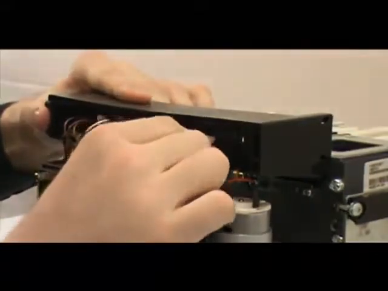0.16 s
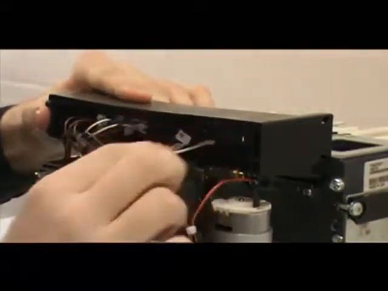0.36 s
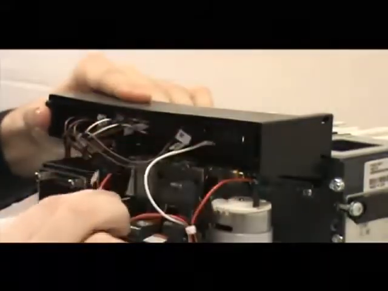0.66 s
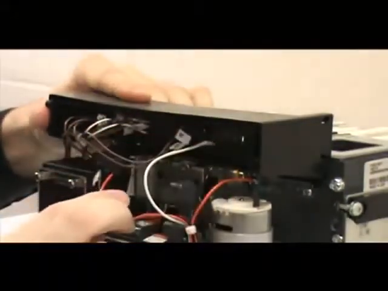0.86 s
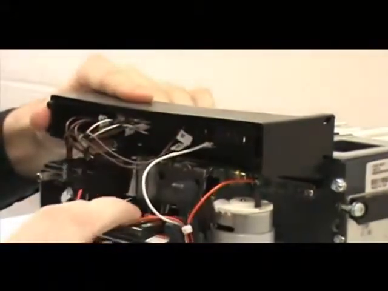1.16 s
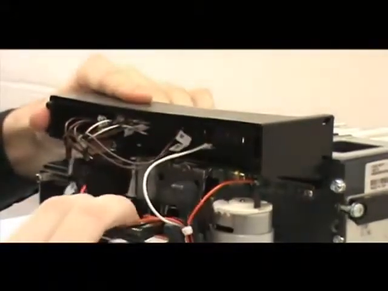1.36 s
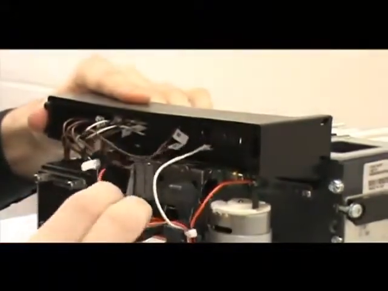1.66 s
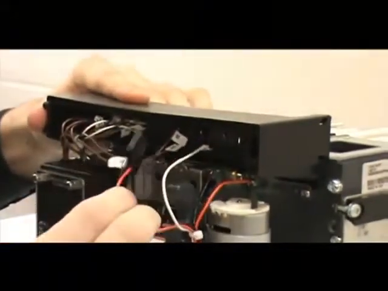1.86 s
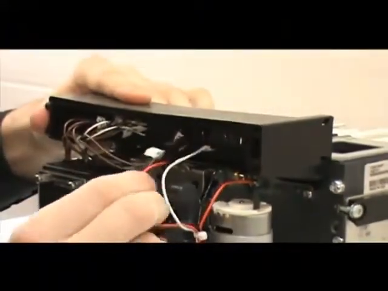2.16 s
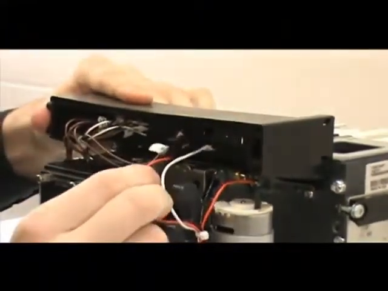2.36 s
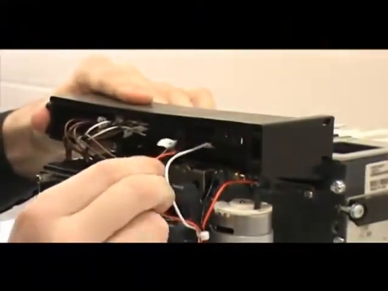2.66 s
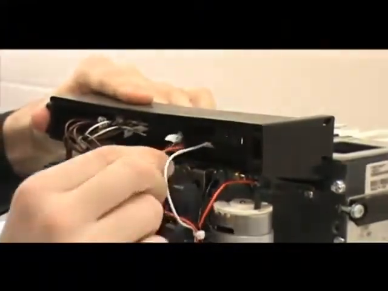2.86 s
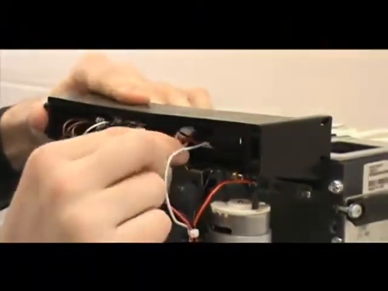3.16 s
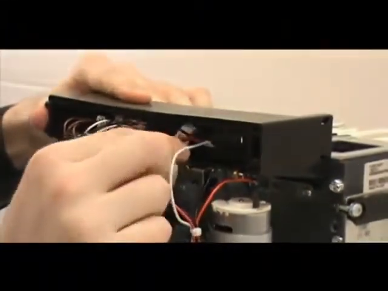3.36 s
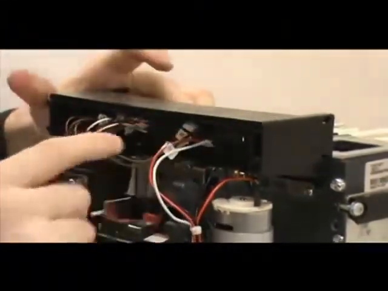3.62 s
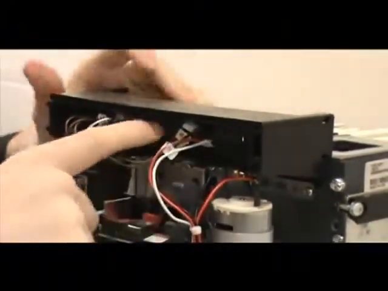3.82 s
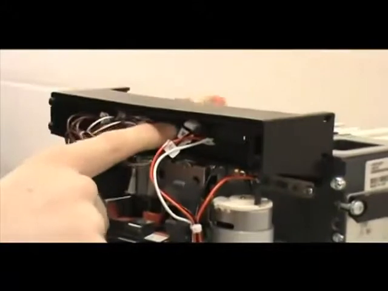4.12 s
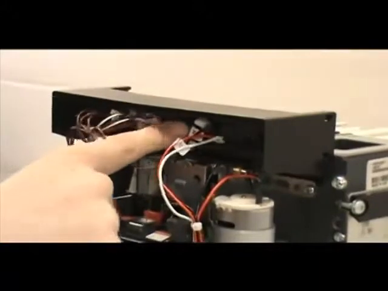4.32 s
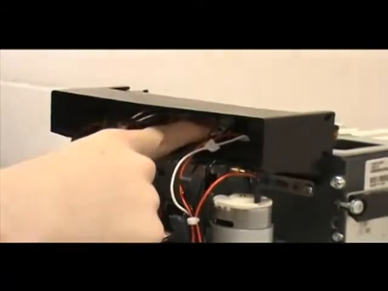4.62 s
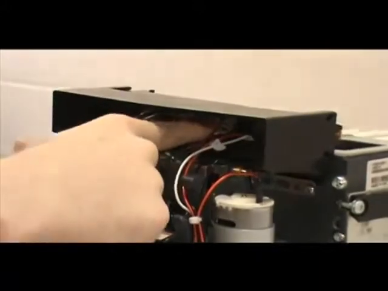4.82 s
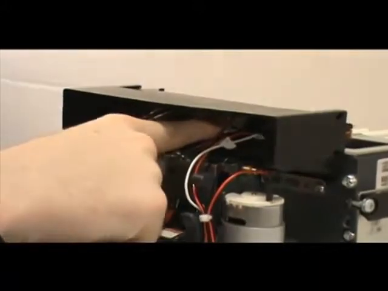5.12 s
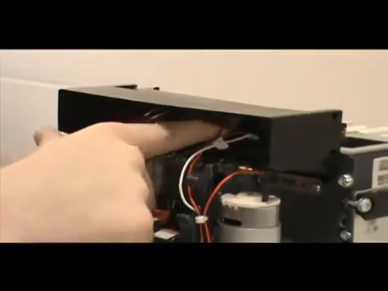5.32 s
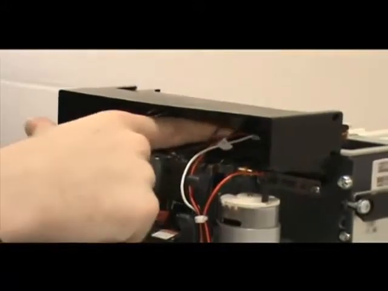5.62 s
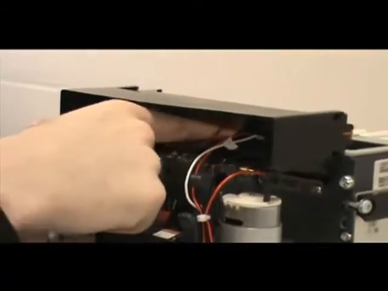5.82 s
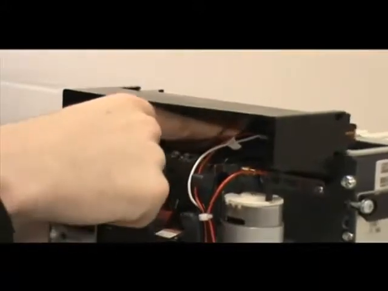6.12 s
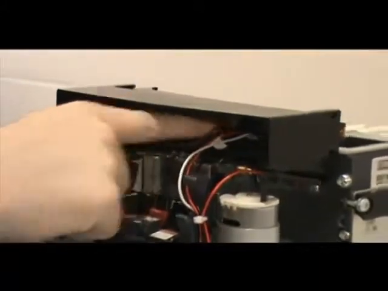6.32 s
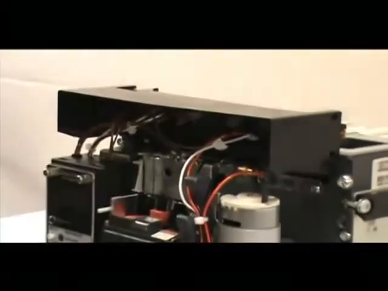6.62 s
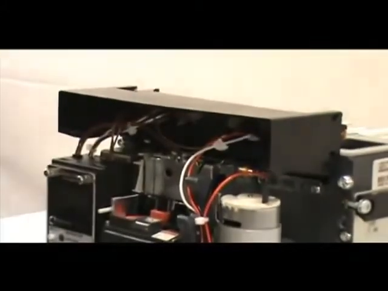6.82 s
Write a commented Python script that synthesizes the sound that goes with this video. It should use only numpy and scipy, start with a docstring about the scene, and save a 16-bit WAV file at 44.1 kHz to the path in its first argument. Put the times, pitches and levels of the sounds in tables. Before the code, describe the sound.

Fingers push plastic wire connectors into a thin metal bracket, very close. A hard double click opens, then near quiet with tiny ticks. Small rattling snaps come near two seconds, a crisp one past three, then gritty scraping leads to the loudest snap just before five. Another strong click follows past six, then a light clatter and a soft sleeve rub. Small room, faint steady low hum and hiss, close stereo microphones.

```python
"""In a small room, fingers push plastic wire connectors into a sheet-metal bracket close to the microphones.
Latches snap in bursts of uneven contacts that ring the bracket's modes; a loose part pings on single notes
and the hollow case thuds as filtered noise. Wires, skin and a sleeve rub over it as grains of friction.
Wavering tones of a fan and the mains hum under the shaped noise of room air and microphone hiss."""
import sys
import numpy as np
from scipy import signal
from scipy.fft import rfft, irfft, next_fast_len
from scipy.io import wavfile
from scipy.ndimage import uniform_filter1d

SR = 44100
rng = np.random.default_rng(int(sys.argv[2]) if len(sys.argv) > 2 else 0)


def field_ratio(decibels):
    """Amplitude ratio for a level in dB (20 dB per decade); scalars and array-likes work."""
    return 10 ** (np.asarray(decibels, dtype=float) / 20)


def transcribe(u):
    """Save the signal u as a 16-bit wav file named by the first command-line argument.

    u: samples, shape (n,) or (channels, n), limited to [-1, 1]; the rate is SR.
    q: integer samples, one column per channel.
    """
    v = np.clip(np.atleast_2d(u).T, -1, 1)
    q = np.round(v * 32767).astype(np.int16)
    wavfile.write(sys.argv[1], SR, q)


N = 307725  # length of the scene [samples]

# latch snaps and knocks, each timed at its first hard hit:
# (time [s], direct peak level [dB], hardness [dB per octave], ring of the latch tongue [dB], slip length [ms])
SNAPS = [(0.0084, 0.5, 6.5, -10, 2.7), (0.0111, -5.5, 2.5, -9, 1.8), (0.651, -41.5, -3, -4, 7),
         (1.246, -39.5, -0.5, 0, 5.5), (1.804, -24, 5.5, -11, 6.6), (1.811, -37, 0, -1, 5.6),
         (1.818, -37, -3, -6, 3.5), (1.850, -18.5, 12, -7, 4.3), (1.858, -26, 11, -4, 4.6),
         (1.866, -36, 0, -7, 3.7), (2.004, -25, 11, -5, 13), (2.014, -28, -6, -9, 3.3),
         (2.022, -27.5, 2, -14, 3.3), (2.030, -33, -3, -8, 2.5), (2.281, -37.5, -1.5, 0, 11),
         (2.808, -36.5, -2, -9, 5.9), (3.117, -29.5, 4.5, -10, 4.5), (3.252, -40, 6, -3, 4.3),
         (3.28, -26.5, 4, -15, 3.7), (3.2843, -11, 2.5, -4, 2.2), (3.285, -12.5, -1, -27, 2.3),
         (3.617, -33, 0, -13, 6.2), (3.627, -29.5, 13, -14, 2.4), (3.766, -34.5, 17, -2, 3.2),
         (3.801, -45.5, -12, -2, 6.6), (3.982, -40, 11, 4, 3.6), (4.336, -37.5, -2.5, 4, 7.2),
         (4.443, -39, -15, -1, 11), (4.476, -40, -2, -3, 4.5), (4.6285, -34, 0, -1, 5),
         (4.649, -30, 0, 5, 5), (4.662, -20, 5, -12, 11), (4.694, -26, -2, -3, 5.5),
         (4.711, -19.5, -5, -4, 5.4), (4.729, -35, 2, 3, 4.1), (4.751, -34, -8, -8, 7.6),
         (4.889, -23, -1, 4, 3.3), (4.893, 8, 3, 5, 1.7), (4.902, -7.5, 9, -8, 2.1), (4.914, -9, 1, -3, 5),
         (4.928, -29, 0, -2, 5), (4.949, -25, 6, -9, 7.8), (5.033, -33.5, -7.5, -4, 7.4),
         (5.38, -35.5, -0.5, 6, 5.2), (5.417, -28.5, -2, 1, 8.6), (5.946, -40, -10, -9, 2.9),
         (6.068, -39.5, -5, -4, 3.7), (6.075, -40, -5, -4, 3), (6.1125, -11, 7, -2, 0.91),
         (6.1147, -2.5, 0.5, 0, 2.8), (6.362, -28.5, -5.5, 14, 4.3), (6.379, -35, -2, 4, 4.5),
         (6.401, -38, 0, 2, 8), (6.482, -40, -8, -3, 5.2), (6.514, -16, 5.5, 0, 5.3),
         (6.5187, -14.5, 2, 0, 1.2), (6.521, -13.5, -0.5, 2, 1.34), (6.533, -23, -3.5, 1, 10)]
# colour of a plain snap, band by band: (band centre [Hz], level [dB])
SNAP_COLOUR = [(1500, -5), (3400, -1.5), (5600, 1), (8800, -0.5)]
# echo after a snap, one entry for each of those bands: (level [dB])
SNAP_ECHO_DB = [-8.5, -9.5, -10.5, -7.5]


def snap(s, peak_db, hard_db, tongue_db, slip_ms):
    """A faint noise rises for a few milliseconds, then a quick run of uneven contacts rings the bracket."""
    lead_in_s, centres_hz = .005, [720, 1500, 3400, 5600, 8800]
    colour_db = [db + hard_db * np.log2(hz / centres_hz[2]) for hz, db in SNAP_COLOUR]
    colour_db[2] += tongue_db
    colour_db[1] -= 0.28 * tongue_db  # the tongue's ring takes a share from the band below it

    t = np.arange(-lead_in_s, .04, 1 / SR)
    lead_in = field_ratio(-26 + 4400 * t)
    slip = np.clip(t / 0.00045, .1, 1) * np.exp(-(1000 * abs(t) / max(slip_ms, .3)) ** 2.2)
    first_crack = 0.72 * (t >= 0) * np.exp(-abs(t - .0008) / 0.00024)  # the hardest contact
    force = np.where(t < 0, lead_in, slip) + first_crack
    chance = rng.standard_normal((2, len(t)))
    hits = force * chance[0] * field_ratio(2.9 * chance[1])
    contacts = signal.fftconvolve(hits, bracket(ring_db=-6.0))

    # each band gets its strongest short-term level from the colour, then the sum gets its peak
    parts = [part * field_ratio(db) / np.sqrt(uniform_filter1d(part ** 2, size=90).max())
             for db, part in zip(colour_db, bands(contacts, centres_hz))]
    parts = np.array(parts) * field_ratio(peak_db) / abs(sum(parts)).max()

    # the case takes the run as one blow and evens out its colour
    blow = np.pad(bracket(ring_db=-4.5, hold=1.34), (round(lead_in_s * SR), len(t)))
    strength = np.linalg.norm(parts, axis=1)
    strength = strength ** 0.73 * strength.mean() ** (1 - .75)
    echoed = sum(size * whole / np.linalg.norm(whole)
                 for size, whole in zip(strength * field_ratio(SNAP_ECHO_DB), bands(blow, centres_hz)))
    return s - lead_in_s, heard(sum(parts), echoed, echo_db=0)


# modes of bracket and latch, before the shift of each contact:
# (frequency [Hz], relative level [dB], time to fall by 60 dB [s])
BRACKET_MODES = [(886, -3.5, 0.16), (1300, -10, 0.062), (1976, 9, 0.028), (2410, 10.5, 0.0032),
                 (3370, 1.5, 0.028), (4180, 0.5, 0.032), (4900, -5, 0.019), (5020, 9, 0.0093),
                 (5980, 9, 0.0089), (8220, 5, 0.025), (8980, 16, 0.0047), (10200, 11.5, 0.015)]


def bracket(ring_db, hold=1):
    """One sharp contact, then decaying modes; each spot touched shifts them and favours others; hold lengthens."""
    t = np.arange(3000) / SR
    ring = np.zeros(len(t))
    for hz, db, t60 in BRACKET_MODES:
        shift, favour, phase = rng.standard_normal(3)
        fading = field_ratio(db + 2.0 * favour - 60 * t / (hold * t60))
        ring += fading * np.sin(2 * np.pi * (hz * (1 + 0.029 * shift) * t + phase))
    ring *= field_ratio(ring_db) / np.linalg.norm(ring)
    ring[0] += 1
    return ring


# a loose part rings on one note:
# (time [s], level [dB], settled pitch [Hz], time to fall by 60 dB [s])
PINGS = [(2.231, -39.5, 2150, 0.053), (3.118, -35, 2070, .035), (3.776, -38.5, 872, 0.16),
         (4.336, -40, 5000, .03), (6.419, -39, 4230, 0.03), (6.426, -41, 4300, 0.03),
         (6.432, -42, 4300, 0.03), (6.521, -25, 1970, 0.03)]


def ping(db, hz, t60):
    """One soft-struck mode, roughened by the touch that damps it, sliding up as the part comes free."""
    t = np.arange(0, t60, 1 / SR)
    flutter = evened(uniform_filter1d(rng.standard_normal(len(t)), round(6.0 * SR / hz)))
    touch = 1 + .3 * flutter
    pitch_hz = hz * (1 - .16 * np.exp(-t * hz / 5))
    soft_start = np.minimum(t * hz / 2.0, 1)  # about two cycles
    note = field_ratio(db - 60 * t / t60) * soft_start * touch * np.sin(2 * np.pi * np.cumsum(pitch_hz) / SR)
    return heard(note, note, echo_db=-15.0)


# the hollow case answers a bump with a dull thud, a snap or scuff with a higher clack:
# (time [s], level [dB], centre frequency [Hz], time to fade by 20 dB [s])
THUDS = [(0.009, -31.5, 3430, .04), (0.015, -39, 1000, 0.033), (0.123, -47, 230, 0.055),
         (1.852, -42, 1040, .02), (1.864, -48.5, 304, 0.095), (1.885, -64, 540, 0.02),
         (1.925, -55, 450, 0.028), (3.043, -55, 2880, 0.033), (3.085, -54, 2060, 0.038),
         (3.289, -38, 2900, 0.045), (3.29, -52, 490, 0.051), (4.1, -52, 6400, 0.033),
         (4.143, -50, 6400, 0.028), (4.148, -55, 4900, .03), (4.336, -49, 550, 0.037),
         (4.648, -43.5, 920, 0.15), (4.66, -53, 238, 0.15), (4.89, -40, 1300, 0.025),
         (5.447, -52.5, 1860, 0.092), (5.943, -57, 563, .03), (5.948, -53, 1540, 0.049),
         (6.073, -50, 970, 0.031), (6.254, -61, 2640, 0.099)]


def thud(db, hz, length_s):
    """A soft push of noise through the resonance of the hollow case: quick swell, slower fade."""
    t = np.arange(0, 2 * length_s, 1 / SR)
    width_hz = 0.23 * hz + 90  # a share of the pitch, plus what the hand on the case adds
    r = np.exp(-np.pi * width_hz / SR)
    body = rng.standard_normal(len(t))
    for _ in range(2):
        body = signal.lfilter([1, 0, -1], [1, -2 * r * np.cos(2 * np.pi * hz / SR), r * r], body)
    swell = np.minimum(t / (0.055 * length_s), 1)
    sound = field_ratio(db - 20 * (t / length_s) ** 2) * swell * evened(body)
    return heard(sound, sound, echo_db=-7.0)


# fingers and wires slide over the bracket, timed at the most pressure:
# (time [s], rise [s], fall [s], level of the middle band [dB], hardness [dB of treble])
RUBS = [(1.809, 0.035, 0.024, -51, -3.5), (1.856, 0.011, 0.027, -48, -5.5),
        (2.021, 0.065, 0.039, -48.5, -2.5), (2.86, 0.19, 0.2, -68, -1.5), (3.07, 0.31, 0.089, -66, -4.5),
        (3.128, 0.0068, 0.058, -60, -7.5), (3.273, 0.039, 0.013, -53.5, -4), (3.618, 0.11, 0.069, -57, -2),
        (3.681, 0.061, 0.017, -53.5, -0.5), (3.98, 0.034, 0.052, -59, -2), (4.56, 0.29, 0.39, -52, -0.5),
        (4.635, 0.012, .06, -47, -4.5), (4.685, 0.1, 0.081, -40, 0.5), (4.872, 0.042, 0.35, -63.5, -5.5),
        (4.96, 0.035, 0.083, -47, 1.5), (5.32, 0.064, 0.072, -58, -3), (5.412, 0.058, 0.03, -55, 8),
        (5.491, 0.067, 0.055, -63, -4), (5.64, 0.14, 0.13, -64.5, -2.5), (5.89, 0.22, 0.071, -58.5, -3),
        (5.96, 0.064, 0.077, -66, -6), (6.084, 0.03, 0.026, -61, -9), (6.26, 0.095, 0.065, -65, -3.5),
        (6.31, 0.033, 0.044, -56.5, -6), (6.368, 0.024, 0.034, -48, -2.5), (6.419, 0.048, 0.067, -49, 0.5),
        (6.495, 0.04, 0.16, -52.5, -1.5)]


def rub(s, rise_s, fall_s, db, hard_db):
    """Pressure swells 20 dB over the rise and drops 20 dB over the fall; a harder contact trades bass for treble."""
    t = np.arange(-.35, .35, 1 / SR)
    away = np.where(t < 0, -t / max(rise_s, .003), t / max(fall_s, .003))
    level_db = db - 20 * away ** 1.53  # the exponent rounds the swell
    # the low spread keeps strokes near the centre
    return s + t[0], friction(level_db, bass_db=-7.5 - 2 * hard_db, treble_db=-3.5 + hard_db, spread_db=-20,
                              ring_db=-6.5, clump_db=3.0, centres_hz=[300, 1050, 3800, 9000])


# the hand and sleeve draw back along the case, off to one side:
# (time [s], level of the middle band [dB])
SLEEVE = [(6.6, -61), (6.698, -59), (6.79, -57.5), (6.83, -51), (6.91, -52.5), (6.94, -54), (6.978, -53)]


def sleeve():
    """One long, dull, wide stroke; cloth hardly rings the metal."""
    s, db = np.transpose(SLEEVE)
    level_db = np.interp(np.arange(s[0], N / SR + 0.019, 1 / SR), s, db)
    return s[0], friction(level_db, bass_db=1.5, treble_db=-3, spread_db=8.5,
                          ring_db=-40, clump_db=1.3, centres_hz=[120, 750, 2600, 9000])


def friction(level_db, bass_db, treble_db, spread_db, ring_db, clump_db, centres_hz):
    """Dense uneven grains of friction excite the bracket; the fingers damp most of the ring."""
    count = len(level_db)
    clumps = evened(uniform_filter1d(rng.standard_normal(count), size=220))
    grit = np.minimum(rng.exponential(1, count), 4)
    grains = rng.standard_normal(count) * field_ratio(clump_db * clumps + 3.5 * grit)
    scraped = signal.fftconvolve(grains, bracket(ring_db))[:count]
    bass, mid, treble = bands(scraped, centres_hz)
    sound = evened(mid) + field_ratio(bass_db) * evened(bass) + field_ratio(treble_db) * evened(treble)
    sound *= field_ratio(level_db) * signal.windows.tukey(count, .1)
    return heard(sound, sound, echo_db=-6.5) * field_ratio([[0], [spread_db]])


# case and table ring on: (frequency [Hz], time to fall by 60 dB [s])
ECHO_DECAY = [(500, 0.43), (1300, 0.14), (3500, 0.25), (9000, 0.15)]


def echo():
    """Dense reflections from case, table and walls, arriving in lumps, as sum and difference of the microphones."""
    noise = rng.standard_normal((2, SR // 4))
    hz, t, z = signal.stft(noise, SR, nperseg=128)
    decay = field_ratio(-60 * t / read(ECHO_DECAY, hz)[:, None])
    tail = signal.istft(z * decay, SR, nperseg=128)[1]
    s = np.arange(tail.shape[1]) / SR
    lumps = evened(uniform_filter1d(rng.standard_normal(len(s)), size=130))
    early = np.clip((s - .003) / 0.00064, 0, 1) * field_ratio(-4)  # case and table alone, more softly
    first_walls = 1 + 0.6 * np.exp(-(s / .02) ** 2)  # the first few answers stand out
    walls = np.clip((s - .007) / 0.0017, 0, 1) * first_walls
    tail = tail * np.maximum(early, walls) * field_ratio(2.0 * lumps)
    return tail / np.linalg.norm(tail[0]) * field_ratio([[0], [-3.0]])


def heard(sound, echoed, echo_db):
    """Sum and difference: the direct sound reaches the left microphone first; the echo follows."""
    lag = 4 / SR
    wet = field_ratio(echo_db) * signal.fftconvolve(echoed[None], echo(), axes=1)
    add(wet[0], lag, sound)
    add(wet[1], 0, sound / 2)
    add(wet[1], 2 * lag, -sound / 2)
    add(wet[1], lag, 0.26 * sound)  # a little louder on the left
    return wet


# tones of the fan and mains: (frequency [Hz], rms level [dB], waver rate [Hz], waver depth [share])
HUM = [(32.8, -60.5, 20, 0.82), (119.6, -56.5, 5.2, 0.91), (139, -51.5, 0.44, 0.034),
       (241.7, -69, 0.48, 0.25), (349, -74, 12, 0.26)]


def hum():
    """Narrow tones of the fan and mains, each wavering in level; the strongest also throbs slowly."""
    hz, t, out = np.fft.rfftfreq(N, 1 / SR), np.arange(N) / SR, np.zeros(N)
    period_s, crest_s, throb_depth = 2.167, 0.58, 0.45
    throb = throb_depth * np.exp(2j * np.pi * (t - crest_s) / period_s)
    for i, (centre_hz, db, waver_hz, depth) in enumerate(HUM):
        slow = 1 / (1 + (hz / waver_hz) ** 4)
        a, b = (evened(irfft(rfft(rng.standard_normal(N)) * slow, N)) for _ in range(2))
        level = 1 + depth * (a + 1j * b) + throb * (i == 2)  # entry 2 is the strongest
        out += field_ratio(db) * evened((level * np.exp(2j * np.pi * centre_hz * t)).real)
    return out


# colour of room air and hiss in the sum of the microphones: (frequency [Hz], relative level [dB per Hz])
AIR_MID = [(12, -71), (20, -10.5), (38, -8), (91, -10.5), (139, -8.5), (155, -10), (168, -12), (231, -13),
           (920, -28.5), (1170, -27.5), (2330, -26), (2590, -30), (9800, -33.5), (10600, -34.5),
           (11500, -37), (15000, -96), (22000, -120)]
# the same in their difference: (frequency [Hz], relative level [dB per Hz])
AIR_SIDE = [(35, -42), (60, -40), (130, -11.5), (188, -56), (364, 0.5), (1490, 1.5), (2120, 1.5), (2410, 6),
            (2880, -4), (4880, -12.5), (9030, -25), (9860, -34), (11500, -52), (15000, -93), (22000, -120)]


def air(spectrum, db, vary_db):
    """Noise of a given colour and rms level, with a level that varies slowly at random across time and frequency."""
    frames, hz = N // 512 + 5, np.fft.rfftfreq(2048, 1 / SR)
    a, b, variation = rng.standard_normal((frames, 1025, 3)).T
    variation = evened(uniform_filter1d(uniform_filter1d(variation, 20, 0), 8, 1))
    z = (a + 1j * b) * field_ratio(read(spectrum, hz)[:, None] + vary_db * variation)
    return field_ratio(db) * evened(signal.istft(z, nperseg=2048, noverlap=1536)[1][:N])


def evened(x):
    """Scales a signal to an rms of one."""
    return x / np.sqrt(np.mean(x ** 2) + 1e-20)


def read(points, hz):
    """Reads a curve of (frequency, value) points along a logarithmic frequency axis."""
    f, value = np.transpose(points)
    return np.interp(np.log(hz + 1), np.log(f + 1), value)


def add(mix, s, sound):
    """Lays a sound into the mix at a time in seconds, cut off at the end."""
    part = mix[..., round(s * SR):][..., :sound.shape[-1]]
    part += sound[..., :part.shape[-1]]


def bands(x, centres_hz):
    """Splits a sound into overlapping bands that add up evenly; nothing is left under the first centre."""
    size = next_fast_len(len(x))
    octave, spectrum = np.log2(np.fft.rfftfreq(size, 1 / SR) + 1), rfft(x, size)
    shares = [np.interp(octave, np.log2(centres_hz), one) for one in np.eye(len(centres_hz))[1:]]
    return [irfft(spectrum * share, size)[:len(x)] for share in shares]


# stereo spread of the near sounds: (frequency [Hz], gain of the difference [dB])
NEAR_SPREAD = [(100, -26.5), (300, -40), (700, -10), (1500, -8), (3000, -8.5), (6000, -5.5), (10000, -9)]


def scene():
    """Hands at the bracket over the room, built as sum and difference, then turned into left and right."""
    hands = np.zeros((2, N))
    for row in SNAPS:
        add(hands, *snap(*row))
    for s, *row in PINGS:
        add(hands, s, ping(*row))
    for s, *row in THUDS:
        add(hands, s, thud(*row))
    for row in RUBS:
        add(hands, *rub(*row))
    add(hands, *sleeve())
    spread = field_ratio(read(NEAR_SPREAD, np.fft.rfftfreq(N, 1 / SR)))
    near_side = irfft(rfft(hands[1]) * spread, N)
    mid = hands[0] + hum() + air(AIR_MID, db=-52, vary_db=2.6)
    side = near_side + air(AIR_SIDE, db=-55, vary_db=1.5)
    return np.array([mid + side, mid - side])


def roll_off(x):
    """The treble ends steeply here."""
    return signal.sosfilt(signal.butter(12, 12010, fs=SR, output="sos"), x)


def record(dry):
    """The loudest peaks saturate softly; then the top of the treble is cut off steeply."""
    full = .76  # level the saturation closes in on [share of full scale]
    saturated = np.tanh(dry / full) * full
    lowpass = signal.firwin(511, 10908, window=("kaiser", 8), fs=SR)[None]
    mix = signal.oaconvolve(saturated, lowpass, "same")
    return roll_off(mix)


dry = scene()
out = record(dry)
transcribe(out)
```